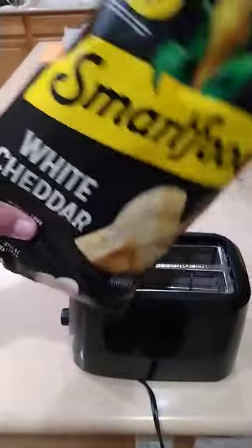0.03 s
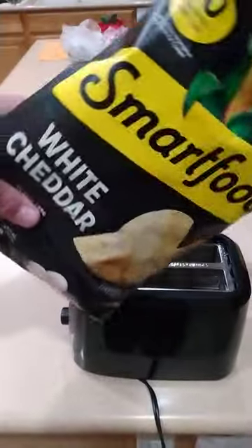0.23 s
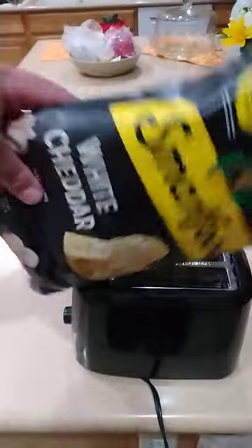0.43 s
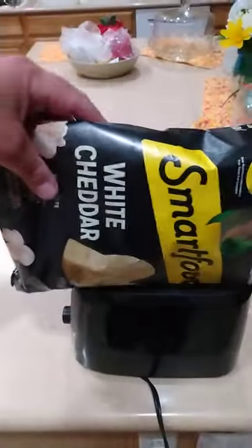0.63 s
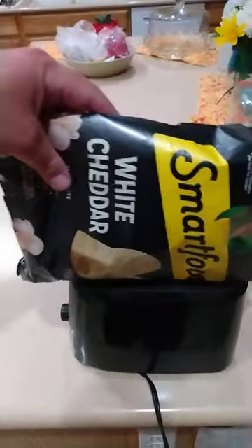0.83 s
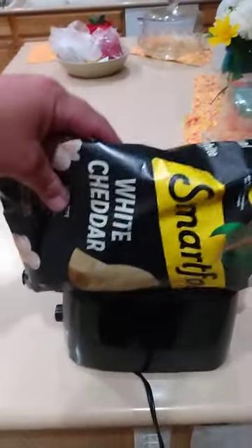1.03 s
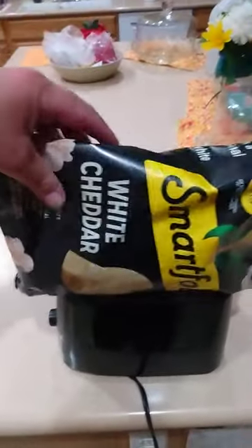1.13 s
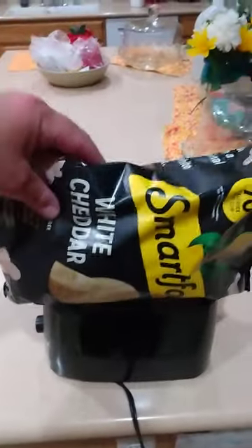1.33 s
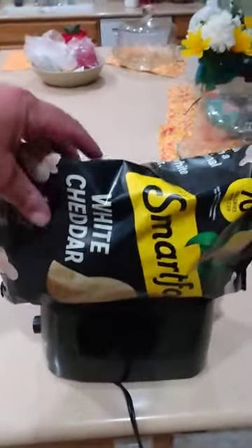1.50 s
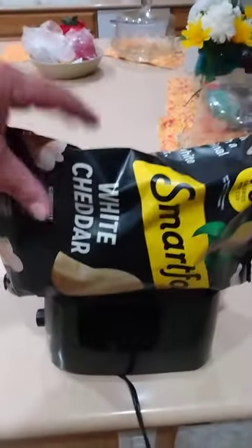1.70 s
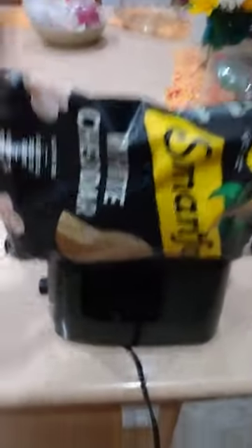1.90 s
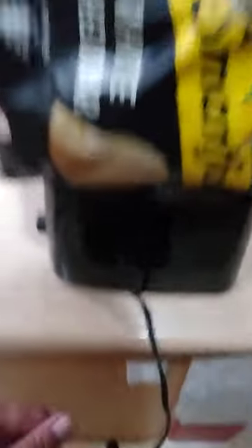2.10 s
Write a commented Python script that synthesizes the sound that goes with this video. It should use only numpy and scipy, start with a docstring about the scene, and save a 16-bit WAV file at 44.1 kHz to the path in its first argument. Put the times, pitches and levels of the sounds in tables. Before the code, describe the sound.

A stiff, air-filled snack bag crinkles and crackles loudly in hands, close up, then goes quiet

```python
"""A kitchen: a stiff, air-filled foil snack bag is turned in the hands and set down near the microphone.
Creases snap one by one, each a burst of slips that rings the film, over clumps of tiny ringing clicks.
The air cushion thumps as soft pushes ring it, and rumbles as low noise; later a lone tap rings a few modes.
Wavering sines make a quiet appliance drone, and shaped noise the hiss below. The room adds a diffuse tail;
a phone-like recorder cuts the lowest bass and the top."""
import sys
import numpy as np
from scipy import signal
from scipy.fft import rfft, irfft
from scipy.io import wavfile
from scipy.ndimage import uniform_filter1d

SR = 44100
rng = np.random.default_rng(int(sys.argv[2]) if len(sys.argv) > 2 else 0)


def wrap_up_sound(samples):
    """Save the sound to the file named by the first command line argument, as 16-bit audio."""
    columns = np.atleast_2d(samples).T
    # keep every value between -1 and 1, then stretch to whole-number steps
    tamed = np.clip(columns, -1, 1)
    steps = np.round(tamed * 32767).astype(np.int16)
    wavfile.write(sys.argv[1], SR, steps)


def voltage_ratio(level):
    """Linear amplitude factor for a level in decibels (scalar or array-like)."""
    return 10 ** (np.asarray(level, float) / 20)


N = 94815   # length of the scene [samples]


def rms_one(x):
    """Scale to rms 1."""
    return x / np.sqrt(np.mean(x ** 2) + 1e-20)


def at_hz(points, hz):
    """Read a spectrum table on a log-frequency axis."""
    table_hz, table_db = np.transpose(points)
    return np.interp(np.log(hz), np.log(table_hz), table_db)


def in_time(points):
    """Join the points of a level curve by straight lines."""
    s, db = np.transpose(points)
    return np.interp(np.arange(N) / SR, s, db)


def drift(rate_hz):
    """Slow chance: noise twice through a one-pole low-pass; rms 1."""
    settle = 9000   # samples dropped while the filter settles
    pole = np.exp(-2 * np.pi * rate_hz / SR)
    noise = rng.standard_normal(N + settle)
    return rms_one(signal.lfilter([1], [1, -2 * pole, pole ** 2], noise)[settle:])


def ring(x, hz, cycles):
    """A resonator: a unit click rings a sine of height about 1 that falls 60 dB in so many cycles."""
    hz = np.clip(hz, 40, 0.4 * SR)
    decay = voltage_ratio(-60 * hz / (max(cycles, 1) * SR))
    turn = 2 * np.pi * hz / SR
    return signal.lfilter([0, np.sin(turn)], [1, -2 * decay * np.cos(turn), decay ** 2], x + 1e-18)


def coloured(spectrum):
    """Steady noise with the given spectrum; rms 1."""
    hz = np.maximum(np.arange(N // 2 + 1) * SR / N, 1)
    white = rfft(rng.standard_normal(N))
    return rms_one(irfft(white * voltage_ratio(at_hz(spectrum, hz)), N))


def even(x):
    """Hold the short-term level of a noise nearly steady; rms 1."""
    window_s = 0.07
    x = rms_one(x)
    power = uniform_filter1d(x ** 2, int(window_s * SR))
    return rms_one(x / np.sqrt(power + 0.05))


def high_pass(x, order, hz):
    """Butterworth low cut."""
    return signal.sosfilt(signal.butter(order, hz, "high", fs=SR, output="sos"), x)


# spectrum of the background hiss: (frequency [Hz], relative level [dB per Hz])
FLOOR_SPECTRUM = [(15, -43.5), (25, 15.5), (44, -12.5), (110, 0.5), (174, -11), (250, 2.5), (360, -3.5),
                  (570, -44), (1240, -17.5), (1360, -21.5), (7620, -22), (8200, -38.5), (10700, -77)]


def floor():
    """Background and microphone hiss: steady noise of fixed spectrum."""
    level_db = -69
    return voltage_ratio(level_db) * coloured(FLOOR_SPECTRUM)


# lines of the appliance drone, around which they waver: (frequency [Hz], level [dB rms])
HUM_LINES = [(115, -79), (243, -73), (360, -84.5)]


def hum():
    """Faint lines of an appliance motor, wavering in level and pitch."""
    level_spread_db, pitch_spread = 3.5, 0.022
    out = np.zeros(N)
    for hz, db in HUM_LINES:
        level = voltage_ratio(db + level_spread_db * drift(10)) * np.sqrt(2)
        phase = 2 * np.pi * np.cumsum(hz * (1 + pitch_spread * drift(5))) / SR
        out += level * np.sin(phase)
    return out


# spectrum of the flexing air cushion: (frequency [Hz], relative level [dB per Hz])
RUMBLE_SPECTRUM = [(30, -49), (63, -5), (110, 0.5), (190, -2.5), (300, -2), (450, -7), (600, -26.5),
                   (900, -8), (1600, -60)]
# how much the whole bag sways, as rumble before its trim: (time [s], level [dB])
SWAY_CURVE = [(0.0, -57), (0.08, -57), (0.1, -48), (0.17, -45), (0.25, -48), (0.28, -55), (0.31, -47),
              (0.48, -46), (0.595, -48), (0.62, -39), (0.66, -39), (0.78, -51), (0.86, -48), (0.92, -51),
              (0.99, -46), (1.03, -41), (1.15, -49), (1.24, -45), (1.39, -44), (1.44, -48), (1.48, -55),
              (1.53, -44), (1.63, -63), (1.72, -71), (1.9, -75), (1.93, -67), (2.1, -73), (2.15, -75)]


def rumble():
    """The air cushion flexes: low noise that follows the sway of the bag, slightly lumpy."""
    trim_db, lumps_per_s, lump_db = -1, 130, 1.74
    lumps = voltage_ratio(lump_db * drift(lumps_per_s))
    noise = rms_one(even(coloured(RUMBLE_SPECTRUM)) * lumps)
    return voltage_ratio(in_time(SWAY_CURVE) + trim_db) * noise


# weight of the tiny creases at each pitch: (frequency [Hz], relative level [dB per Hz])
CRACKLE_SPECTRUM = [(240, -30), (400, -38.5), (605, -6), (1190, 4), (1990, -5), (2170, 2), (3970, -18.5),
                    (7150, -18.5), (8000, -22.5), (10400, -59)]
# how hard the hands squeeze, as crackle before its trim: (time [s], level [dB])
SQUEEZE_CURVE = [(0.0, -56), (0.08, -62), (0.1, -50.5), (0.17, -52), (0.25, -49.5), (0.28, -63),
                 (0.31, -47), (0.35, -55), (0.42, -47.5), (0.48, -53.5), (0.55, -49), (0.595, -45.5),
                 (0.62, -29), (0.66, -39.5), (0.7, -39.5), (0.78, -55.5), (0.86, -53.5), (0.92, -49.5),
                 (0.99, -43.5), (1.03, -41.5), (1.1, -40), (1.15, -45), (1.2, -44), (1.24, -51),
                 (1.3, -43.5), (1.39, -41.5), (1.44, -51.5), (1.48, -64), (1.53, -40), (1.56, -63.5),
                 (1.63, -57.5), (1.72, -70), (1.9, -79.5), (1.93, -67), (2.03, -70.5), (2.1, -79),
                 (2.13, -70), (2.15, -76)]


def crackle():
    """Tiny creases come in clumps, each ringing a few cycles at one of many pitches."""
    grains_per_s, grain_spread_db, grain_cycles = 3500, 2.2, 3.5   # rate is before clumping
    clumps_per_s, clump_db = 110, 1.4
    trim_db, low_cut_hz = -0.67, 350
    clumps = voltage_ratio(clump_db * drift(clumps_per_s))
    sizes = voltage_ratio(grain_spread_db * np.minimum(rng.exponential(1, N), 3.5)) * rng.choice([-1, 1], N)
    grains = sizes * clumps * (rng.random(N) < grains_per_s * clumps / SR)
    pitches_hz = np.geomspace(450, 8000, 24)
    dealt = rng.integers(0, len(pitches_hz), N)   # which pitch each grain gets
    rings = np.zeros(N)
    for k, hz in enumerate(pitches_hz):
        weight = voltage_ratio(at_hz(CRACKLE_SPECTRUM, hz)) * hz   # hz makes up for shorter rings
        rings += weight * ring(grains * (dealt == k), hz, grain_cycles)
    rings = high_pass(rings, 2, low_cut_hz)
    return voltage_ratio(in_time(SQUEEZE_CURVE) + trim_db) * even(rings)


# creases that buckle, before the snap, crack and length trims:
# (time [s], level [dB], ring [Hz], bright crack [dB re ring], length [ms])
CREASES = [(0.0464, -42.5, 1570, 3, 2.6), (0.0983, -33.5, 865, -2, 2), (0.1061, -34, 890, -25, 2.8),
           (0.1286, -33, 1150, -16, 2.9), (0.1546, -36, 2030, -11, 2.4), (0.1756, -40.5, 2400, -35, 3.3),
           (0.2115, -30, 1510, -10, 2.7), (0.221, -42.5, 1660, -11.5, 6.3), (0.229, -37.5, 2200, -9.5, 4.8),
           (0.309, -37, 6630, -1, 1.7), (0.3186, -31.5, 2820, -10.5, 2.5), (0.365, -34, 933, -18, 3.3),
           (0.3717, -46, 860, -10, 2.3), (0.3894, -42, 1500, -19, 8.9), (0.404, -44, 2500, -25, 2.5),
           (0.4255, -35.5, 2750, -4, 3.9), (0.4464, -28, 2330, 5.5, 1.8), (0.4525, -32.5, 950, -20.5, 1.9),
           (0.4938, -27, 1400, -6, 2.6), (0.4967, -23, 3000, -5.5, 2.7), (0.5078, -37, 1260, -10, 13),
           (0.5377, -35, 805, -16.5, 1.8), (0.5744, -16, 2280, -12.5, 1.5), (0.581, -42, 1030, 3.5, 3.6),
           (0.612, -24.5, 1014, -15.5, 5.8), (0.6164, -22, 2000, -4, 3.7), (0.6263, -17, 2220, -5, 2.6),
           (0.639, -17.5, 1044, -11, 2.1), (0.65, -21.5, 1500, -1, 2.6), (0.6737, -32.5, 3300, 5, 3),
           (0.6832, -33, 2090, -5.5, 5.1), (0.7113, -25, 2580, -21.5, 2), (0.7342, -20.5, 1270, -15.5, 2.7),
           (0.735, -25, 2840, -11, 3), (0.766, -42, 1330, 1.5, 1.9), (0.7729, -32.5, 1590, 5, 1.05),
           (0.8372, -41, 1480, -16, 4.7), (0.8574, -38, 1120, -18, 5.2), (0.887, -35.5, 2500, -9.5, 2.7),
           (0.9231, -30.5, 1575, -8, 2.9), (0.936, -32.5, 1490, -19, 4.8), (0.9682, -41, 594, -26, 2.4),
           (0.9806, -43.5, 1750, -18, 4.5), (0.9895, -42.5, 1630, -22.5, 4.8),
           (1.0118, -33, 2000, -10.5, 12), (1.0325, -28, 1210, -30, 2.9), (1.052, -23, 1140, -5, 3.8),
           (1.0577, -33, 3480, -8, 2), (1.065, -25, 1130, -17, 2.1), (1.073, -28, 3000, -3, 3.4),
           (1.0775, -31.5, 2800, -12, 3.3), (1.096, -31, 1206, -11.5, 2), (1.102, -40, 2170, -4, 2.5),
           (1.1096, -25.5, 1290, -1, 1.1), (1.1161, -31.5, 880, 3.5, 3.6), (1.1626, -29.5, 2560, -8.5, 1.9),
           (1.1697, -17.5, 2460, -21.5, 0.68), (1.1864, -26, 2130, -10, 3.3),
           (1.1907, -27.5, 2190, -10.5, 9.8), (1.205, -30.5, 1680, -16, 4.1),
           (1.2193, -27.5, 2520, -12, 1.7), (1.223, -24.5, 1510, -25, 2.1), (1.2495, -28.5, 1380, -33, 1.4),
           (1.256, -34.5, 2520, -22.5, 6.7), (1.265, -27, 1640, -21, 2.2), (1.2897, -32, 1530, -13, 1.1),
           (1.2953, -29, 2250, -25, 3.2), (1.3043, -26.5, 1440, -17.5, 4.1), (1.3216, -25.5, 1280, -19, 5),
           (1.344, -31, 1550, -18.5, 1.4), (1.36, -32, 2360, -6.5, 3.3), (1.3754, -22, 2270, -5, 2),
           (1.3823, -32.5, 1800, -4, 3), (1.3892, -21, 1265, -10.5, 1.2), (1.4069, -29, 2360, 1.5, 1.1),
           (1.4257, -30, 1990, -16, 1.2), (1.456, -37, 2050, -31, 3.5), (1.498, -34, 1460, -7, 2.1),
           (1.5051, -38, 1830, -18, 2.7), (1.514, -38.5, 3540, -7, 2.9), (1.5301, -40, 1270, -14, 2),
           (1.537, -34.5, 2380, -14.5, 5.7), (1.5694, -35.5, 1240, -27, 3.5),
           (1.6079, -34.5, 2500, -7, 2.6), (1.672, -46.5, 1490, -7, 5.9), (2.12, -53.5, 950, -8, 3.7),
           (2.128, -59.5, 2100, -3, 28)]
# modes of the bag, struck anew each time: (frequency [Hz], relative level [dB])
BAG_MODES = [(760, 1), (980, 5.5), (1280, -4), (1550, -0.5), (2080, -7.5), (2500, 4), (3100, 0.5),
             (3900, -10)]


def bag_body(tear, crease_hz, dice):
    """The tear rings the bag's modes; a small, high crease hardly stirs the modes below its own."""
    cycles, spread_db, below_db_per_oct = 4.43, 3.5, 3.5
    out = np.zeros(len(tear))
    for k, ((hz, db), chance) in enumerate(zip(BAG_MODES, dice)):
        octaves_below = min(np.log2(hz / min(crease_hz, 2500)), 0)
        level_db = db + spread_db * chance + below_db_per_oct * octaves_below
        out += voltage_ratio(level_db) * ring(tear, hz, cycles) * (-1) ** k
    return out


def snaps():
    """Each buckle is a kick and dying slips into its own mode and the bag's modes, with a bright crack."""
    size = 1500   # samples rendered for each snap
    snap_trim_db, low_cut_hz, ring_cycles, body_db = -4.5, 523, 6.5, -3.5
    length_share, rise_s, kick = 0.56, 0.00037, 1.27   # slips die over this share of the listed length
    crack_s, crack_trim_db = 0.00081, -2.5
    bright = signal.butter(2, 3300, "high", fs=SR, output="sos")
    dull = signal.butter(1, 7300, fs=SR, output="sos")
    crack_band = np.vstack([bright, dull])
    out, t = np.zeros(N + size), np.arange(size) / SR
    for s, db, hz, listed_crack_db, ms in CREASES:
        slips, hiss = rng.standard_normal((2, size))
        dice = rng.standard_normal(len(BAG_MODES))
        crack_db = listed_crack_db + crack_trim_db
        length_s = max(ms, 0.5) / 1000 * length_share
        shape = (1 - np.exp(-t / rise_s)) * np.exp(-t / length_s)
        tear = slips * shape + kick * np.sqrt(length_s * SR / 20) * (t == 0)
        own = rms_one(ring(tear, hz, ring_cycles))
        body = rms_one(bag_body(tear, hz, dice))
        crack = rms_one(signal.sosfilt(crack_band, hiss * (shape + np.exp(-t / crack_s))))
        mix = rms_one(own + voltage_ratio(body_db) * body + voltage_ratio(crack_db) * crack)
        # the level belongs to the own ring over the slip length; body and crack add their power
        power = 1 + voltage_ratio(2 * body_db) + voltage_ratio(2 * crack_db)
        level = voltage_ratio(db + snap_trim_db) * np.sqrt(length_s * SR / size * power)
        i = int(s * SR)
        out[i:i + size] += level * mix
    return high_pass(out[:N], 2, low_cut_hz)


# bumps of the air cushion, peak level before the trim: (time [s], level [dB], ring [Hz])
CUSHION_BUMPS = [(0.099, -38, 268), (0.151, -40, 194), (0.304, -37.5, 231), (0.345, -39, 253),
                 (0.435, -36.5, 197), (0.493, -30.5, 312), (0.604, -24.5, 425), (0.707, -30.5, 197),
                 (0.792, -42, 166), (0.846, -35.5, 306), (0.93, -42.5, 320), (0.956, -37, 370),
                 (1.012, -28, 409), (1.197, -40, 343), (1.216, -27.5, 236), (1.248, -30.5, 331),
                 (1.304, -34, 238), (1.432, -39.5, 230), (1.514, -37.5, 232), (1.579, -56, 312),
                 (1.605, -51, 310), (1.671, -53, 297), (1.918, -50, 207)]


def bumps():
    """Each bump is a soft push that rings the air cushion for a few cycles."""
    size = 4000   # samples rendered for each bump
    cycles, soft_s, trim_db = 14.8, 0.0011, -3
    out, t = np.zeros(N + size), np.arange(size) / SR
    push = t * np.exp(-t / soft_s)
    for s, db, hz in CUSHION_BUMPS:
        wave = np.diff(ring(push, hz, cycles), prepend=0)
        i = int(s * SR)
        out[i:i + size] += voltage_ratio(db + trim_db) * wave / np.abs(wave).max()
    return out[:N]


# modes of the lone tap: (frequency [Hz], level [dB re the tap], decay [cycles to -60 dB])
TAP_MODES = [(1020, -2.5, 14), (2000, -5, 22), (3380, -6.5, 47), (4340, -7.5, 32), (6600, -6, 33)]


def tap():
    """A lone tap of the hand on the bag: one short soft push sets a few separate modes ringing."""
    start_s, level_db, soft_s = 1.9174, -33.5, 0.00005
    t = np.maximum(np.arange(N) / SR - start_s, 0)
    push = t / soft_s * np.exp(-t / soft_s) / (soft_s * SR)
    out = np.zeros(N)
    for k, (hz, db, cycles) in enumerate(TAP_MODES):
        out += voltage_ratio(level_db + db) * ring(push, hz, cycles) * (-1) ** k
    return out


def kitchen(x):
    """A dense diffuse tail from the first wall on; the treble dies twice as fast as the lows."""
    t60_s, wall_cut_hz, first_wall_s, level_db = 0.45, 7300, 0.0049, -12.5
    t, white = np.arange(SR) / SR, rng.standard_normal(SR)
    lows = signal.sosfilt(signal.butter(1, wall_cut_hz, fs=SR, output="sos"), white)
    treble = white - lows
    tail = lows * voltage_ratio(-60 * t / t60_s) + treble * voltage_ratio(-120 * t / t60_s)
    tail = tail * (t > first_wall_s)
    tail = tail / np.sqrt(np.sum(tail ** 2))
    return voltage_ratio(level_db) * signal.fftconvolve(x, tail)[:N]


def scene():
    """The bag near the microphone, its echo in the kitchen, the rumble, the hiss and the drone."""
    film = crackle() + snaps() + bumps() + tap()
    mix = floor() + hum() + rumble() + film + kitchen(film)
    return mix[None]   # one channel


def low_pass(x):
    """Removes everything above the highest recorded frequency."""
    return signal.sosfilt(signal.butter(12, 8680, fs=SR, output="sos"), x)


def record(dry):
    """The phone-like recorder: bass roll-off, steep top cut and faint quantiser hiss."""
    bass_cut_hz, top_cut_hz, hiss_db = 62, 8600, -95.5
    x = high_pass(dry, 2, bass_cut_hz)
    x = signal.sosfilt(signal.cheby2(12, 50, top_cut_hz, fs=SR, output="sos"), x)
    mix = x + voltage_ratio(hiss_db) * rng.standard_normal(x.shape)
    return low_pass(mix)


dry = scene()
out = record(dry)
wrap_up_sound(out)
```